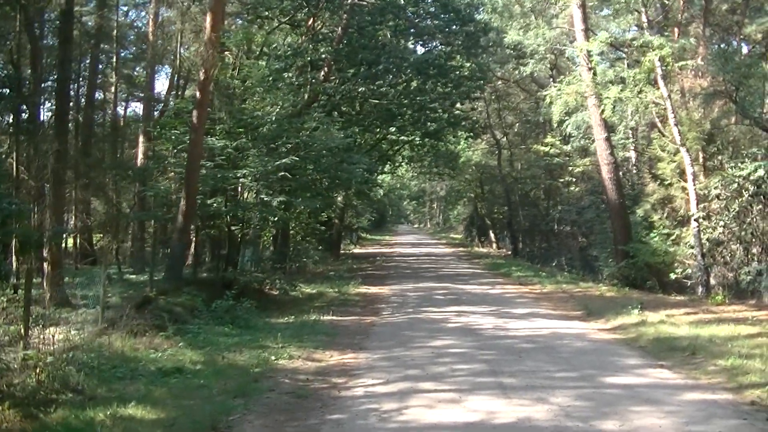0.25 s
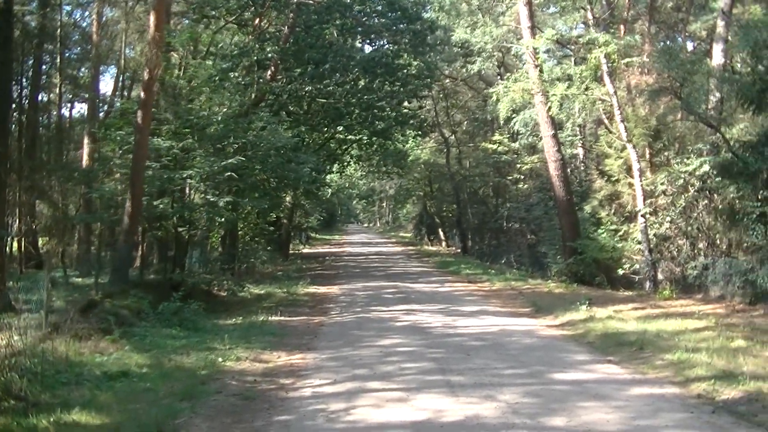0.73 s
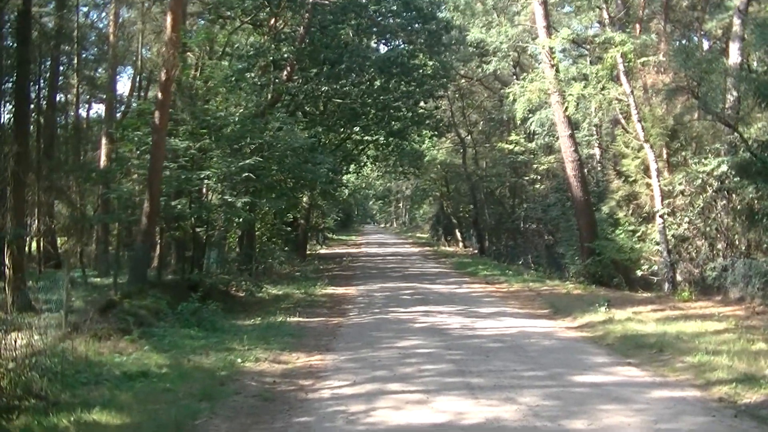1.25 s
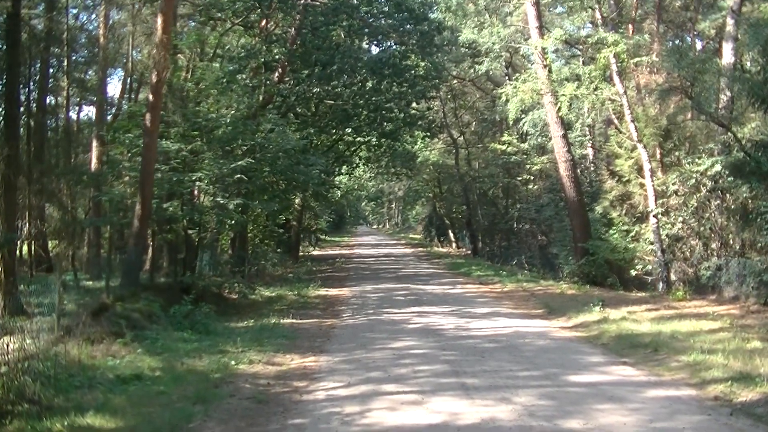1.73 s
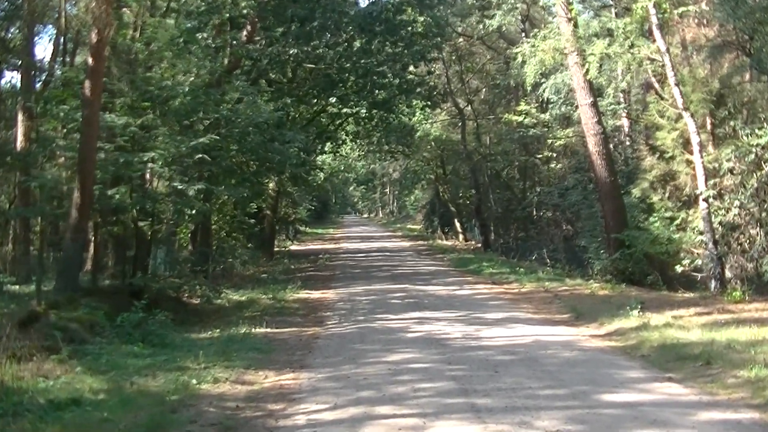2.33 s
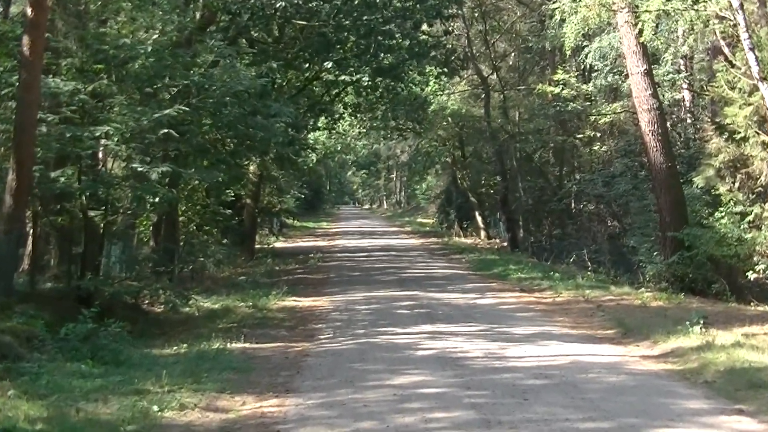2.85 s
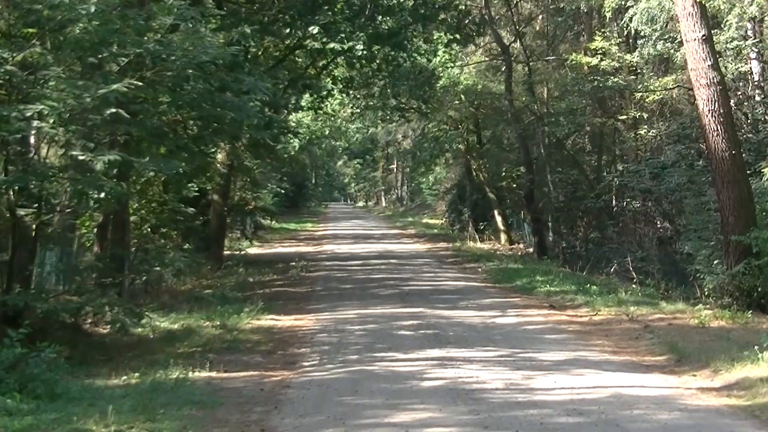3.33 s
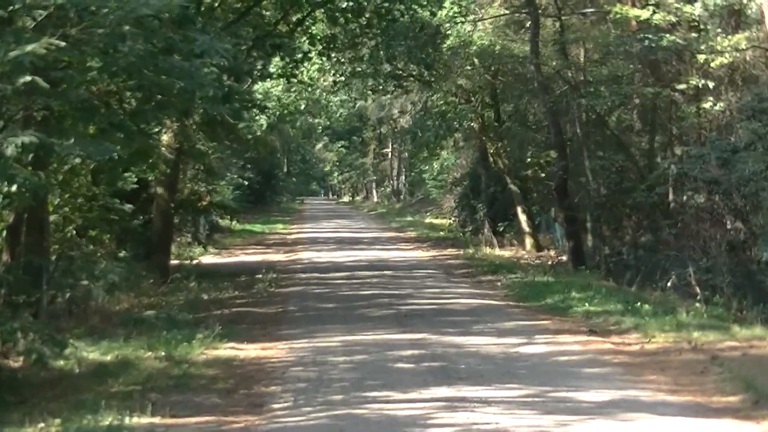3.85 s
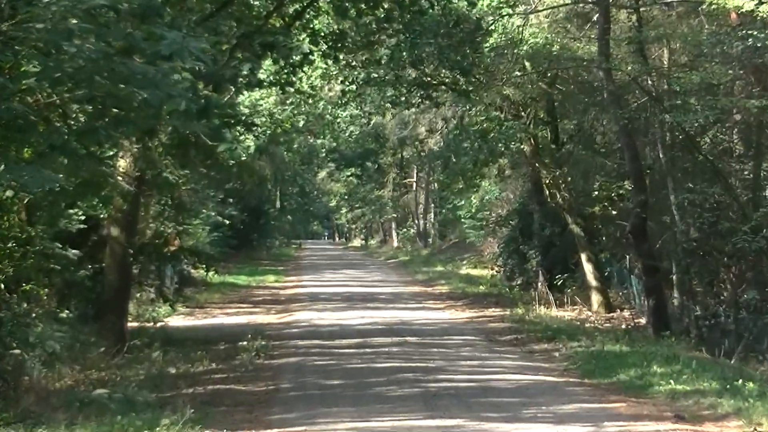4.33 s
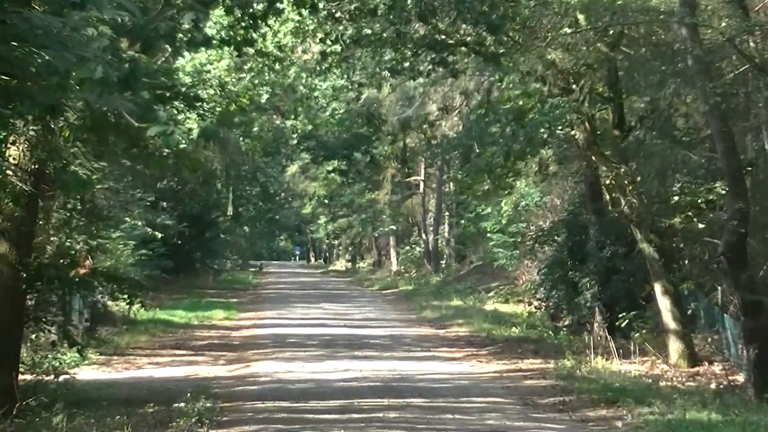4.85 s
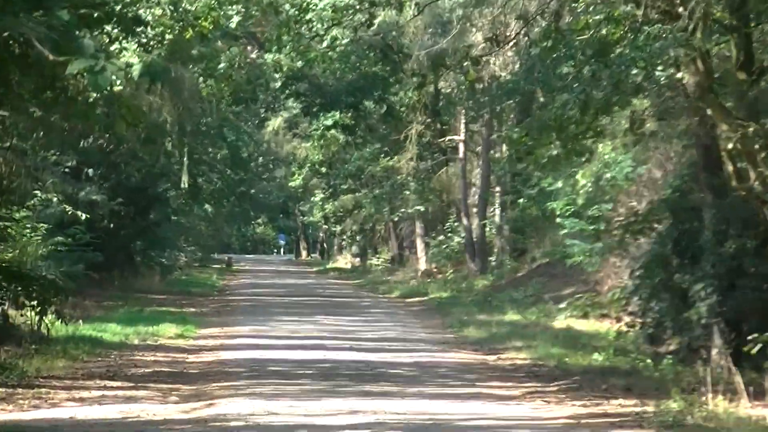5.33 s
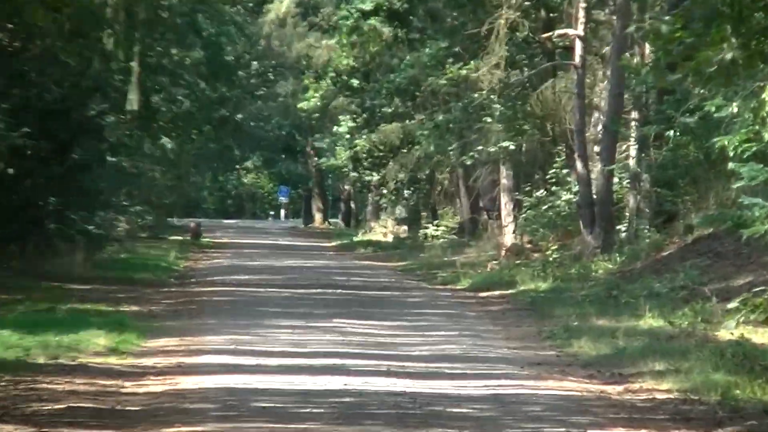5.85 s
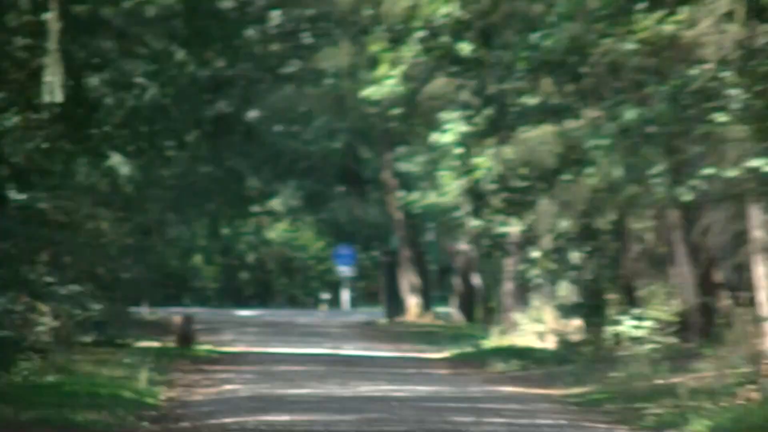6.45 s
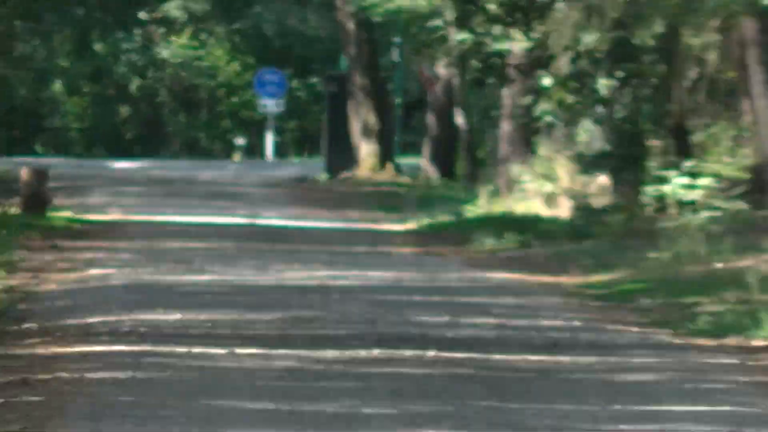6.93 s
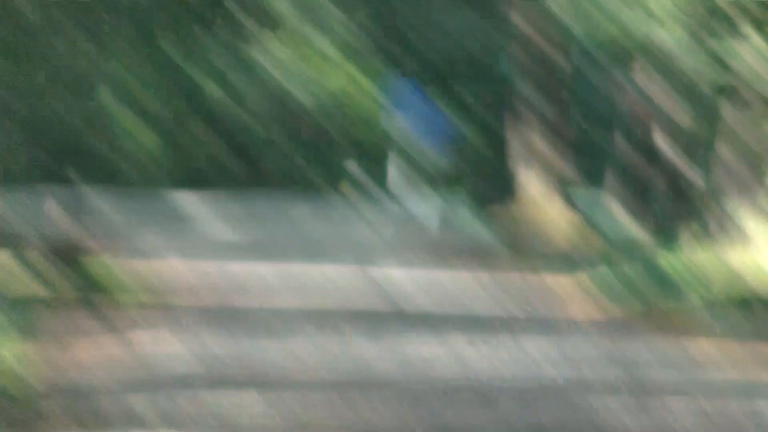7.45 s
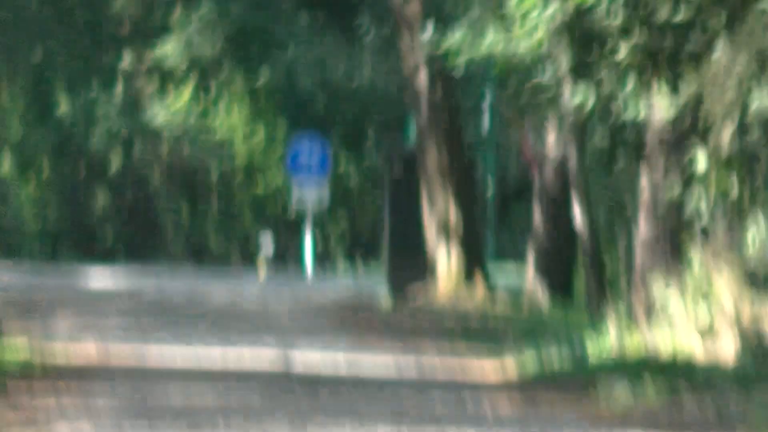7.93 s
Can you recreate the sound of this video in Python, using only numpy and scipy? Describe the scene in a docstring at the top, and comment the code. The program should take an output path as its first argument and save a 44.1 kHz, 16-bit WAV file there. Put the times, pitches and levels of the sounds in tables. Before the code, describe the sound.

On a quiet forest road, everything is heard very close through a hand-held camera's stereo microphones, over soft air, hiss and slight low wind. From 0 to 0.8 s fingers scuff and shift on plastic with tiny ticks. At 0.84 s comes by far the loudest event, a sharp dry snap with a hollow thud; a weaker snap follows at 1.28 s and a click at 1.59 s. At 1.7 s the lens mechanism ticks and chirps, and from 1.86 s a steady low motor hum runs near 200 Hz with faint treble whine and smooth friction. A crisp tick lands at 3.48 s; clattering ticks gather from 4.2 s as the hum weakens after 4.9 s. Around 6.3-7.55 s a lumpy, throbbing grind groans and rumbles. The hum ends near 6.6 s; thin high whistles sound between 6.7 and 7.6 s. Then only hiss and tiny ticks remain.

```python
"""A quiet forest road, heard by the two microphones of a hand-held camera. Fingers snap and rub the plastic
shell: decaying modes and grainy noise. A stepper motor then hums in multiples of its step rate while the lens
barrel slides, ticks and, near the end of its travel, grinds: noise and soft blows through resonances, and a
groan of short low tones. A second small motor whistles briefly in steady tones. A little low wind noise,
with a rumble during the grind, and microphone hiss, all shaped noise, lie under it all."""
import sys
import numpy as np
from scipy import signal
from scipy.fft import rfft, irfft
from scipy.io import wavfile
from scipy.ndimage import uniform_filter1d

SR = 44100
rng = np.random.default_rng(int(sys.argv[2]) if len(sys.argv) > 2 else 0)


def transcribe(signal):
    """Save signal, clipped to [-1, 1], as a 16-bit WAV file at the path in sys.argv[1]."""
    frames = np.atleast_2d(signal).T
    limited = np.clip(frames, -1, 1)
    pcm = np.round(limited * 32767).astype(np.int16)
    wavfile.write(sys.argv[1], SR, pcm)


N = 361619
T = np.arange(N) / SR
RING_T = np.arange(4096) / SR  # time axis of one struck sound, s
SIDE = np.array([[.5], [-.5]])  # left and right share of a level difference

# Lens barrel resonances. Each row: centre in Hz, width in Hz, then relative levels in dB when sliding,
# when grinding and when ticked.
BARREL_MODES = [(170, 90, -12, -3, -2), (330, 100, -15, 0, 3), (1010, 150, -17, -13, -8),
                (1360, 260, -22, -8, -5), (1600, 250, -17, -10, -7), (2070, 90, -14, -1, -11),
                (2350, 230, -11, -10, 1), (2600, 250, -10, -11, -5), (3190, 240, -15, -14, -8),
                (4010, 200, -20, -20, -14), (4450, 300, -19, -10, -14), (5680, 250, -22, -22, -20),
                (7700, 400, -30, -20, -26)]
LOW_MODE_TOP_HZ = 500  # barrel modes below this form its low body
SLIDE_S = (1.7, 7.57)  # the barrel slides from, to


def undb(db):
    """Decibels to gain."""
    return 10 ** (np.asarray(db) / 20)


def level(x, rms_db):
    """Scale to an rms level."""
    return x * undb(rms_db) / np.sqrt(np.mean(x ** 2))


def curve(rows, col):
    """One column of a table over time; -120 dB outside it."""
    rows = np.array(rows)
    return np.interp(T, rows[:, 0], rows[:, col], left=-120, right=-120)


def on_log_axis(table, col):
    """One column of a frequency table at every spectrum bin, interpolated over log frequency."""
    hz = np.maximum(np.arange(N // 2 + 1) * SR / N, 1)
    table = np.array(table)
    return np.interp(np.log(hz), np.log(table[:, 0]), table[:, col])


def swell(t0, t1, rise_s, fall_s):
    """Gain that rises linearly from t0, holds, and has faded by t1."""
    rise = (T - t0) / rise_s
    fall = (t1 - T) / fall_s
    return np.clip(np.minimum(rise, fall), 0, 1)


def band(x, hz, width_hz):
    """One resonance, gain 1 at the centre."""
    return signal.lfilter(*signal.iirpeak(hz, hz / width_hz, fs=SR), x)


def walk(rate_hz):
    """Random levels held 1 / rate_hz seconds and slewed; spread somewhat under 1."""
    k = int(SR / rate_hz)
    held = np.repeat(rng.standard_normal(N // k + 1), k)
    return uniform_filter1d(held, k)[:N]


def grit(scatter_db, grains_per_s):
    """Noise whose strength wanders from grain to grain."""
    return rng.standard_normal(N) * undb(scatter_db * walk(grains_per_s))


def ring(hz, t60_s, rise_s, phase):
    """A decaying mode with a soft start."""
    onset = 1 - np.exp(-RING_T / rise_s)
    decay = np.exp(-np.log(1000) * RING_T / t60_s)
    return onset * decay * np.sin(2 * np.pi * hz * RING_T + phase)


def add(out, start_s, x):
    """Mix in a short sound at its start time."""
    i = int(start_s * SR)
    out[..., i:i + x.shape[-1]] += x[..., :out.shape[-1] - i]


def ports(x):
    """Shell paths from one source to the two ports: level and phase differences by frequency."""
    # Each row: Hz, left minus right in dB, left lead in radians.
    paths = [(170, 1.5, -0.32), (534, -1.5, -0.45), (1160, -5.5, 0.71), (1250, -21, -2.3),
             (1550, -8.5, 1.54), (2150, -7, 1.48), (2690, 0.5, 1.85), (3400, 8.5, 1.57), (3500, 17, 2.4),
             (3640, -9.5, -0.6), (4050, -9.5, -2), (3990, -0.5, 0.99), (4900, 3.5, 1.24), (5350, 1, 2.37),
             (7600, 7, -2.5)]
    half = undb(on_log_axis(paths, 1) / 2) * np.exp(.5j * on_log_axis(paths, 2))
    spectrum = rfft(x)
    return np.array([irfft(spectrum * half, N), irfft(spectrum / half, N)])


def shell_strikes():
    """Finger snaps, and one sharp lens tick at 3.48 s, ring the decaying modes of the shell."""
    # Each row: start in s, strength in dB, treble tilt in dB per octave, middle modes relative in dB.
    hits = [(0.8025, -30.5, -6, -4.5), (0.8143, -24, -2.5, -4), (0.8361, 3.5, 2.5, -2.5),
            (1.1957, -32, -1, -2.5), (1.2847, -4.5, 0, -2.5), (1.5434, -22.5, 4, -6),
            (1.5891, -7.5, 0.5, -11.5), (3.4795, -21, 5.5, -10)]
    # Each row: Hz, relative level in dB, t60 in s, left minus right in dB, left lead in radians.
    shell_modes = [(810, -25, 0.0089, -4, 4.4), (1100, -25, 0.013, -10, 10), (1790, -17, 0.02, -6.5, 5),
                   (2560, -19, 0.014, -5, 4), (3216, -15, .014, -4.5, 7.5), (3427, -2.5, 0.0078, -3.5, 1.5),
                   (4180, -10.5, 0.0075, -1.5, 10), (4850, -13.5, 0.0051, -1, 1.5),
                   (5980, -7.5, 0.0038, 3, 2.06), (8940, -30.5, 0.0059, -6, 17),
                   (12100, -26, 0.0019, -1, -5)]
    out = np.zeros((2, N))
    for start_s, db, tilt_db, middle_db in hits:
        for hz, mode_db, t60_s, pan_db, lead in shell_modes:
            left = undb(pan_db / 2) * ring(hz, t60_s, 0.0012, lead)
            right = undb(-pan_db / 2) * ring(hz, t60_s, 0.00071, 0)
            gain_db = db + mode_db + tilt_db * np.log2(hz / 3500)
            if 1500 < hz < 3700:
                gain_db += middle_db
            add(out, start_s, undb(gain_db) * np.array([left, right]))
    return out


def bumps():
    """The whole body thuds in the hand, a low mode plus a hollow knock."""
    # Each row: start in s, strength in dB, thud in Hz, hollow knock relative in dB, 1 pushed in or -1 let go.
    hits = [(.803, -27.5, 185, 6, 1), (0.8372, -4, 203, 1.5, 1), (0.878, -20, 175, 0, 1),
            (1.128, -32.5, 107, 4, 1), (1.183, -33, 135, -8, 1), (1.286, -6.5, 214, -21, -1),
            (1.301, -25, 70.5, 5, 1), (1.3198, -22, 104, -4, 1)]
    knock = ring(340, 0.013, 0.0063, 0)
    out = np.zeros((2, N))
    for start_s, db, hz, knock_db, sign in hits:
        thud = ring(hz, 2.14 / hz, 0.0014, 0) + undb(knock_db) * knock
        add(out, start_s, np.sign(sign) * undb(db + SIDE) * thud)
    return out


def move(t0, t1):
    """One hand movement swells, holds and fades in fixed shares of its length."""
    return swell(t0, t1, 0.2 * (t1 - t0), 0.35 * (t1 - t0))


def rubs():
    """Skin scuffs over the shell: grainy noise through broad resonances."""
    # Each row: start in s, end in s, level in dB, left minus right in dB.
    strokes = [(0.192, 0.39, -57.5, 6), (.345, 0.404, -56.5, 5), (0.414, 0.52, -59.5, 6.5),
               (0.813, 0.908, -51.5, -1), (0.908, 1.017, -52.5, 3), (1.014, 1.23, -62.5, 3),
               (1.213, 1.307, -59, 3), (1.272, 1.338, -53.5, -2)]
    # Rub colour. Each row: centre in Hz, width in Hz, relative level in dB.
    colour = [(1240, 2700, -3.5), (2290, 390, 8.5), (3330, 1200, -0.5), (5460, 2300, -5.5)]
    skin = grit(3.9, 140)
    scuff = sum((-1) ** k * undb(db) * band(skin, hz, width_hz)
                for k, (hz, width_hz, db) in enumerate(colour))
    gain = sum(move(t0, t1) * undb(db + SIDE * pan_db) for t0, t1, db, pan_db in strokes)
    return ports(level(scuff, 0)) * gain


def grip():
    """The shifting grip rumbles dully: narrow low bands of noise, partly its own at each port."""
    # Each row: start in s, end in s, level in dB, centre in Hz.
    shifts = [(0.046, .2, -62.5, 288), (0.177, 0.424, -61.5, 285), (.44, .6, -66, 265),
              (.66, .72, -65, 242), (.76, .81, -71, 209), (.91, 1.036, -54, 300), (1.1, 1.253, -60, 130),
              (1.255, 1.31, -56, 207), (1.31, 1.404, -54, 75), (1.4, 1.606, -55, 89),
              (1.49, 1.58, -54.5, 219), (1.594, 1.69, -63, 250)]
    shared = grit(5.9, 29.54)
    moves = np.array([move(t0, t1) for t0, t1, _, _ in shifts])
    _, _, db, centre_hz = np.transpose(shifts)
    out = np.zeros((2, N))
    for hz in (58.6, 112, 248, 390):
        pair = np.array([band(0.21 * shared + grit(3.4, 29.86), hz, 0.11 * hz) for _ in range(2)])
        octaves_off = abs(np.log2(centre_hz / hz))
        gain = undb(db - 15.0 * octaves_off) @ moves
        out += level(pair, 0) * gain * undb(SIDE * 4.8)
    return out


def stepper():
    """Motor hum: sines at multiples of the step rate, most of them wavering in level."""
    # Each row: multiple of the step rate, rms level in dB before waver and sag.
    partials = [(1, -75), (1.5, -76), (2, -52), (2.5, -72), (3, -58), (3.5, -71), (4, -80), (10, -78),
                (16, -79), (21, -75.5), (22, -68), (23, -69), (24, -71), (25, -67), (25.5, -76),
                (26, -61.5), (27, -79), (28, -78), (30, -80), (31, -75.5), (32, -76), (33, -79), (34, -82),
                (35, -79), (40, -76), (41, -83), (44, -76), (45, -76), (46, -83), (48, -78.5), (49, -82),
                (57, -83), (78, -88)]
    # Step rate, reached through one slower stage and left the same way. Each row: time in s, rate in Hz.
    step_rate = [(1.85, 87.5), (1.93, 87.5), (1.95, 100), (6.47, 100), (6.49, 90), (6.7, 90)]
    run_s, rise_s, fall_s = (1.86, 6.62), .02, 0.075
    sag_from_s, sag_db_per_s = 4.9, -1.64  # the hum weakens as the lens travels out
    s, hz = np.transpose(step_rate)
    turns = np.cumsum(np.interp(T, s, hz)) / SR
    out = np.zeros(N)
    for multiple, db in partials:
        depth_db = .4 if multiple in (1, 2, 3) else 2.4
        waver_db = depth_db * (.5 * walk(6) + walk(40))
        out += undb(db + waver_db) * np.sin(2 * np.pi * (multiple * turns + rng.random()))
    sag_db = sag_db_per_s * np.maximum(T - sag_from_s, 0)
    return np.sqrt(2) * out * undb(sag_db) * swell(*run_s, rise_s, fall_s)


def slide():
    """Smooth friction noise shakes the barrel's resonances, with a hollow in the treble."""
    smooth = grit(1.5, 150)
    out = sum((-1) ** k * undb(slide_db) * band(smooth, hz, width_hz)
              for k, (hz, width_hz, slide_db, _, _) in enumerate(BARREL_MODES))
    out = out - .6 * band(out, 2910, 220)  # the sliding barrel hardly sounds here
    return level(out, -55) * swell(*SLIDE_S, 0.18, 0.039)


def grind():
    """Lumpy friction noise shakes the barrel; the rattle throbs once a gear turn, ever deeper."""
    # Each row: time in s, rattle level in dB before the throb, low body level in dB.
    levels = [(6.2, -64, -67), (6.4, -53.5, -58), (6.5, -51.5, -54.5), (6.68, -53.5, -53.5),
              (6.77, -53.5, -56.5), (6.95, -54, -57), (7.02, -56, -51), (7.25, -55, -54),
              (7.4, -55.5, -53.5), (7.52, -52, -54.5), (7.56, -75, -69)]
    gear_turn_s = .08  # eight motor steps
    throb_peak_s, throb_from_s, throb_db_per_s = 6.67, 6.1, 4
    lumpy = grit(2.0, 200)
    low = sum(undb(grind_db) * band(band(lumpy, hz, width_hz), hz, width_hz)
              for hz, width_hz, _, grind_db, _ in BARREL_MODES[:2])
    rattle = sum((-1) ** k * undb(grind_db) * band(lumpy, hz, width_hz)
                 for k, (hz, width_hz, _, grind_db, _) in enumerate(BARREL_MODES[2:]))
    depth_db = throb_db_per_s * np.maximum(T - throb_from_s, 0)
    throb_db = depth_db * np.cos(2 * np.pi * (T - throb_peak_s) / gear_turn_s)
    return level(rattle, 0) * undb(curve(levels, 1) + throb_db) + level(low, 0) * undb(curve(levels, 2))


def groan():
    """Each jolt of the grind swells into a short low tone that sags in pitch."""
    # Each row: jolt in s, peak in dB, nominal pitch in Hz.
    surges = [(6.322, -49, 285), (6.366, -42.5, 304), (6.406, -46, 347), (6.463, -52, 363),
              (6.502, -42, 327), (6.576, -49, 336), (6.628, -43, 339), (6.663, -43, 337),
              (6.699, -44.5, 289), (6.821, -50, 278), (6.862, -53, 380), (6.902, -49, 283),
              (6.981, -49, 339), (7.042, -45, 355), (7.1, -46, 322), (7.161, -52, 307), (7.192, -48.5, 350),
              (7.285, -46, 372), (7.398, -48, 355), (7.467, -45.5, 375), (7.504, -48, 323)]
    length_s, lead_s, sag_share = 0.04, 0.0099, .1  # starts lead_s before the jolt
    t = np.arange(int(length_s * SR)) / SR
    hump = np.sin(np.pi * t / length_s) ** 2
    out = np.zeros(N)
    for jolt_s, db, hz in surges:
        turns = hz * t * (1 + sag_share * (.5 - .5 * t / length_s))
        add(out, jolt_s - lead_s, undb(db) * hump * np.sin(2 * np.pi * (turns + rng.random())))
    return out


def ticks():
    """A soft blow and a short loose rattle ring the barrel, most near the tick's own brightest pitch."""
    # Each row: start in s, strength in dB, brightest pitch in Hz, low body strength in dB.
    hits = [(0.092, -41.5, 1290, -53), (.241, -49, 3180, -73), (0.309, -36, 2600, -48),
            (.344, -36, 1500, -65), (0.354, -33.5, 1600, -57), (0.383, -36, 1000, -45.5),
            (0.474, -50, 2640, -53), (.579, -42, 2090, -56), (.737, -40, 2700, -63),
            (1.302, -27, 1140, -55), (1.316, -39, 1100, -53), (1.347, -38, 1150, -53),
            (1.369, -48, 1400, -62), (1.696, -16.5, 2570, -60), (1.697, -23.5, 1600, -70),
            (1.703, -34.5, 1440, -41.5), (1.883, -34, 1550, -43), (1.912, -46, 1500, -48),
            (1.931, -52, 1500, -54), (3.562, -38, 1500, -55), (3.596, -48, 1500, -62),
            (3.696, -33, 1100, -49), (3.721, -28.5, 2380, -57), (3.73, -33, 1100, -59),
            (4.189, -35, 1400, -54), (4.211, -24, 1560, -38), (4.234, -54, 1200, -54),
            (4.52, -32.5, 2320, -44), (4.532, -26, 1140, -37), (4.609, -25.5, 1280, -35.5),
            (4.633, -40, 1200, -46), (4.679, -26.5, 2330, -53), (4.69, -26.5, 1040, -36.5),
            (4.76, -29.5, 2370, -51), (4.771, -31, 1220, -37), (4.864, -40, 1210, -47),
            (4.939, -35, 2040, -43), (5.57, -26.5, 1030, -36), (5.633, -33, 1100, -51),
            (5.649, -31.5, 1000, -41), (5.959, -26, 2280, -45.5), (6.074, -30, 1580, -55),
            (6.092, -34, 1000, -48), (6.188, -39, 1190, -43), (6.259, -34, 2070, -39),
            (6.657, -27.5, 1480, -50), (7.508, -32.5, 2400, -41), (7.627, -35, 1670, -68),
            (7.858, -53, 2100, -69), (7.895, -43, 2500, -65), (7.956, -41.5, 2220, -65),
            (7.997, -50, 2200, -66), (8.036, -42, 2100, -65), (8.075, -56, 2200, -69),
            (8.095, -42, 2300, -67), (8.137, -50, 2200, -64), (8.157, -37, 2900, -64)]
    focus_db_per_octave = 13  # fall away from the brightest pitch
    blows = []
    for k, (hz, width_hz, *_) in enumerate(BARREL_MODES):
        if hz < LOW_MODE_TOP_HZ:  # the low body answers later and rings longer
            blows.append(ring(hz, .045, .002, 0))
        else:
            blows.append((-1) ** k * ring(hz, 2.54 / width_hz, .0015, 0))
    out = np.zeros(N)
    for start_s, db, bright_hz, low_db in hits:
        moving = SLIDE_S[0] < start_s < SLIDE_S[1]
        decay_s = 34.6 / bright_hz if moving else 0.0032  # a moving barrel rattles longer
        rattle = rng.standard_normal(len(RING_T)) * np.exp(-RING_T / decay_s)
        for blow, (hz, width_hz, _, _, mode_db) in zip(blows, BARREL_MODES):
            if hz < LOW_MODE_TOP_HZ:
                gain_db, loose_db = low_db, -20
            else:
                gain_db, loose_db = db - focus_db_per_octave * abs(np.log2(hz / bright_hz)), -24
            loose = band(band(rattle, hz, 1.63 * width_hz), hz, 1.63 * width_hz)
            loose = loose * np.sqrt(SR / width_hz)  # makes up for the narrow band
            add(out, start_s, undb(gain_db + mode_db) * (blow + undb(loose_db) * loose))
    return signal.sosfilt(signal.butter(2, 123, "high", fs=SR, output="sos"), out)


def whistles():
    """The second motor: short tones of steady pitch that waver slightly in level."""
    # Each row: start in s, end in s, Hz, rms level in dB before the waver.
    tones = [(1.713, 1.79, 3200, -67), (1.707, 1.79, 1600, -68), (1.695, 1.72, 4800, -66),
             (1.775, 1.85, 4800, -66), (1.757, 1.83, 250, -59), (6.739, 6.952, 2700, -66),
             (6.99, 7.268, 4000, -61), (6.99, 7.268, 4100, -63.5), (7.255, 7.5, 3200, -57),
             (7.26, 7.5, 3100, -68), (7.49, 7.548, 3200, -63), (7.572, 7.594, 3200, -64)]
    out = np.zeros(N)
    for t0, t1, hz, db in tones:
        gain = swell(t0, t1, .0071, .0071) * undb(db + 1.5 * walk(40))
        out += gain * np.sqrt(2) * np.sin(2 * np.pi * hz * T)
    return out


def wind_and_rumble():
    """Low wind noise, with a rumble during the grind, unrelated at the two ports."""
    # Each row: time in s, level in dB.
    low_noise = [(0, -68.5), (1.5, -57), (2.5, -78), (3.3, -69), (6.25, -63), (6.4, -51.5), (6.85, -54.5),
                 (7.0, -66), (7.55, -61), (7.65, -62.5), (8.2, -64)]
    hz, width_hz = 140, 200
    pair = [level(band(band(grit(3.0, 14), hz, width_hz), hz, width_hz), 0) for _ in range(2)]
    return np.array(pair) * undb(curve(low_noise, 1))


def air_and_hiss():
    """Steady forest air and microphone hiss: shaped noise, unrelated at the two ports."""
    # Each row: Hz, relative density in dB.
    colour = [(18, -32), (30, -1), (157, -11), (328, -4.5), (374, -4.5), (426, -6), (486, -8.5),
              (600, -11.5), (844, -12.5), (1280, -16), (2170, -12.5), (8080, -18), (16000, -25.5)]
    # Each row: Hz, left minus right in dB.
    balance = [(60, 6), (400, 3), (800, 6.5), (2000, 1.5), (8000, 0)]
    pair = []
    for side in (.5, -.5):
        gain = undb(on_log_axis(colour, 1) + side * on_log_axis(balance, 1))
        pair.append(irfft(rfft(rng.standard_normal(N)) * gain, N))
    return level(np.array(pair), -57.5)


def scene():
    """Most lens sounds take the shell paths to the ports; the other layers bring their own two channels."""
    lens = stepper() + slide() + grind() + groan() + ticks() + whistles()
    shell = shell_strikes() + bumps() + rubs() + grip()
    return shell + ports(lens) + wind_and_rumble() + air_and_hiss()


def record(dry):
    """The microphones thin out the deepest bass; the recorder cuts the top."""
    low_cut_hz, top_hz = 45, 15800
    thinned = signal.sosfilt(signal.butter(2, low_cut_hz, "high", fs=SR, output="sos"), dry)
    return signal.sosfilt(signal.ellip(10, .2, 80, top_hz, fs=SR, output="sos"), thinned)


dry = scene()
out = record(dry)
transcribe(out)
```